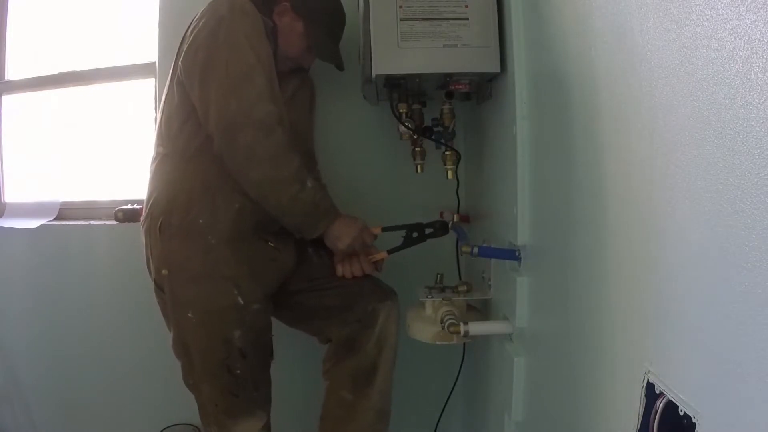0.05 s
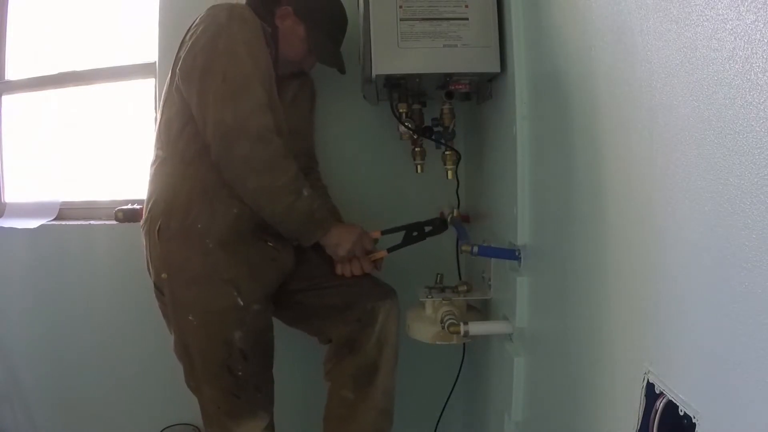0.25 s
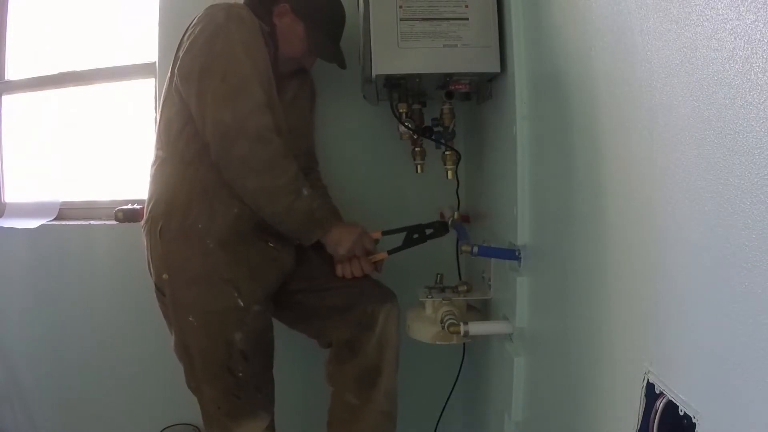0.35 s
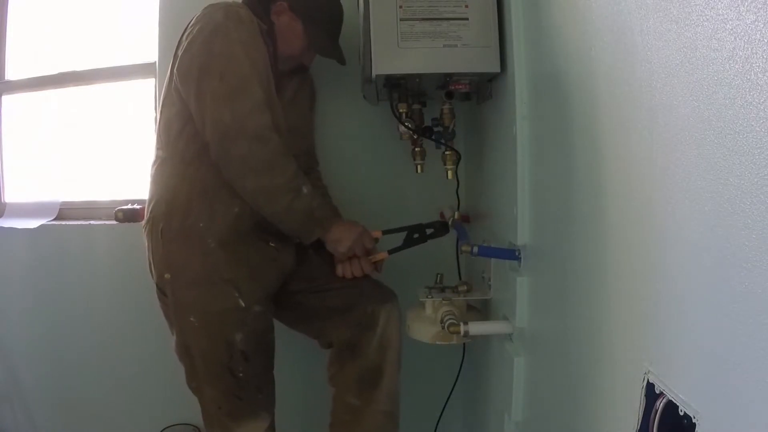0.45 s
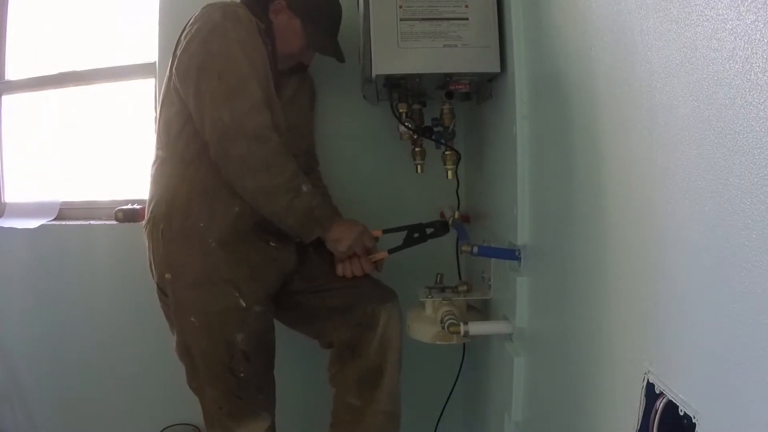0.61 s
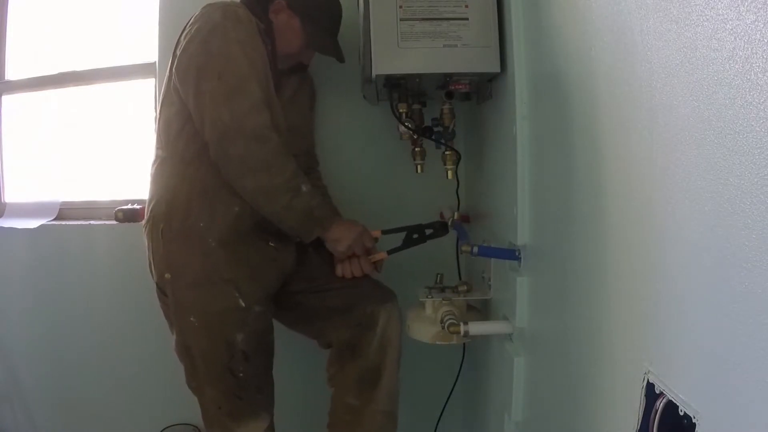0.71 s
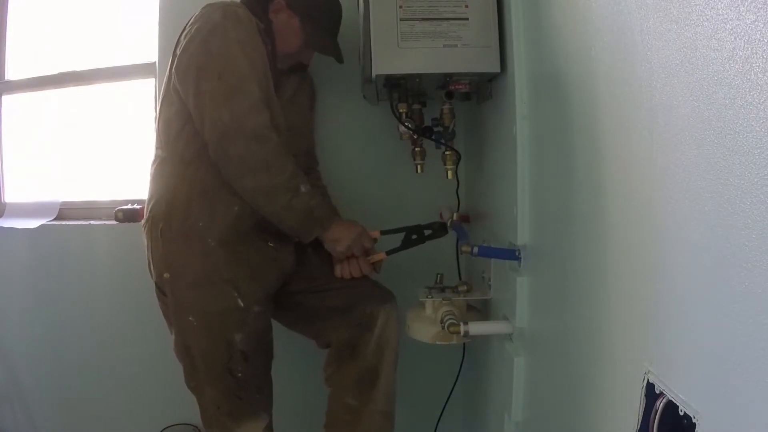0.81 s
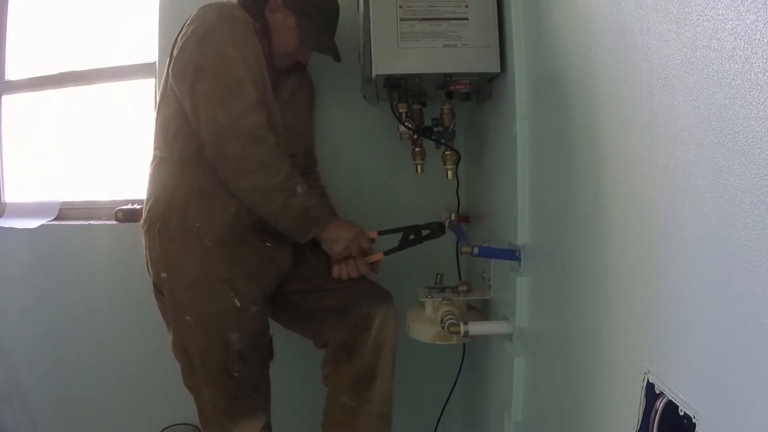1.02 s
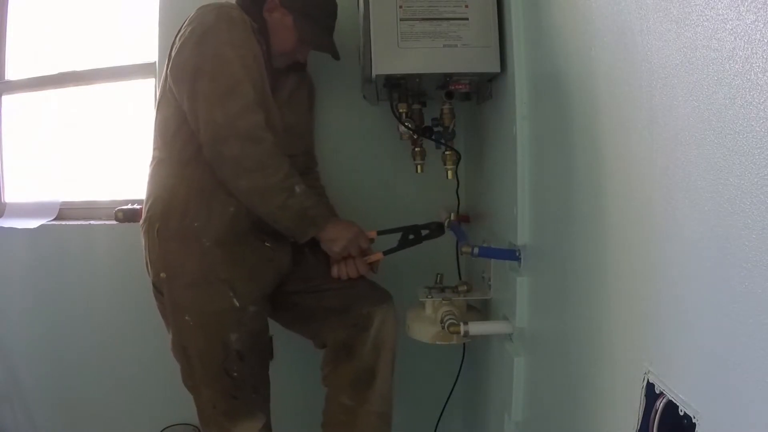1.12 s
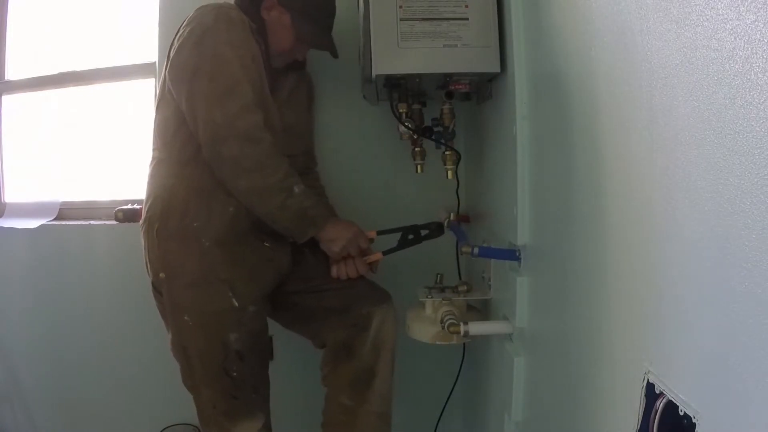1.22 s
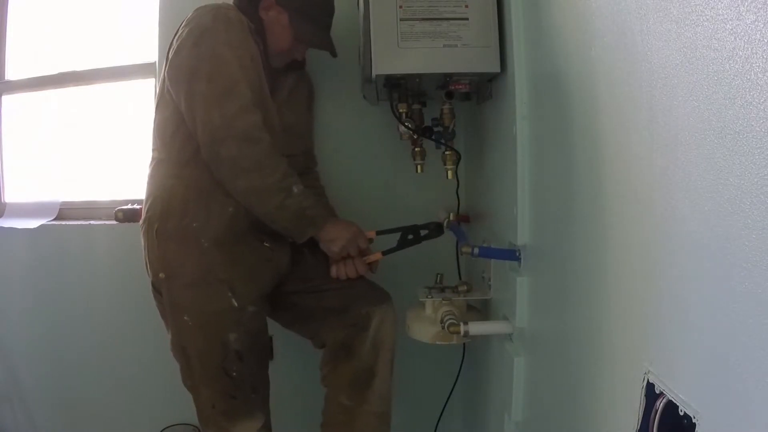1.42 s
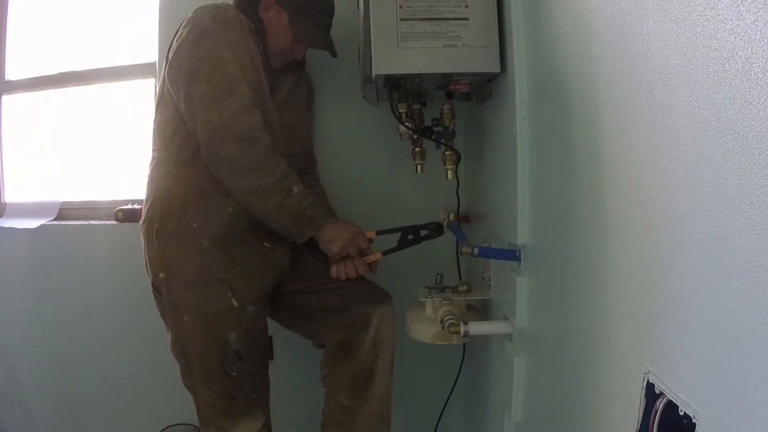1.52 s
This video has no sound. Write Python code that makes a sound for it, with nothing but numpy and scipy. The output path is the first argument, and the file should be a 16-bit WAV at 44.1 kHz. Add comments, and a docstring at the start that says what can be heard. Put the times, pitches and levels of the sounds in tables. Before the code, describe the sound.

A ratchet crimping tool gives a few quick metallic clicks right from the start. At about 0.2 seconds the clamp snaps shut with a loud crack, and the pipe rings briefly in the bare, echoing room. From around 1 second the jaws open with small ticks and a thin, high ring. A short, dull clatter follows near 1.2 seconds, then two faint ticks at 1.4, over a faint room hush.

```python
"""Quick clicks echo in a bare room: a long-handled ratchet crimper is squeezing a clamp onto a pipe,
and its pawl (a small catch) drops over tooth after tooth. The clamp snaps shut with a loud crack
that shakes pipe and wall. After a pause the jaws let go with small ticks and a thin ring of steel,
and the tool knocks free of the fitting. A faint hush of air lies under it all."""
import sys
import numpy as np
from scipy import signal
from scipy.fft import next_fast_len
from scipy.io import wavfile
from scipy.ndimage import uniform_filter1d

SR = 44100
rng = np.random.default_rng(int(sys.argv[2]) if len(sys.argv) > 2 else 0)


def to_wav(s):
    """Save 16-bit WAV."""
    ch = np.atleast_2d(s).T  # columns
    pcm = np.round(np.clip(ch, -1, 1) * 32767)  # PCM
    wavfile.write(sys.argv[1], SR, pcm.astype(np.int16))


N = 68355
T = np.arange(N) / SR


def amp(db):
    """Turns decibels into a number to multiply a sound by."""
    return 10 ** (np.asarray(db) / 20)


def read(points, hz):
    """Looks up a value between a table's rows, with every octave equally wide."""
    row_hz, value = np.transpose(points)
    return np.interp(np.log(hz + 1), np.log(row_hz), value)


def fade(t, t60):
    """Dies away by 60 dB in t60 seconds, the 'fade time'."""
    return np.exp(-np.log(1000) * t / t60)


def unit(x):
    """Scales a sound to a total energy of one."""
    return x / np.sqrt(np.sum(x ** 2) + 1e-20)


def place(s, sound):
    """Starts a sound at s seconds, with silence around it."""
    at = round(s * SR)
    return np.pad(sound[max(-at, 0):], (max(at, 0), N))[:N]


def colour(x, points):
    """Makes each frequency louder or softer, as a table says."""
    size = next_fast_len(2 * N)
    hz = abs(np.fft.fftfreq(size, 1 / SR))
    log_gain = np.log(amp(read(points, hz)))
    response = np.exp(np.conj(signal.hilbert(log_gain)))  # rings after a blow, never before it
    return np.fft.ifft(np.fft.fft(x, size) * response).real[:N]


def even_noise(size=1024):
    """Noise with its strongest chance peaks softened."""
    spectrum = signal.stft(rng.standard_normal(N), nperseg=size)[2]
    noise = signal.istft(spectrum / (abs(spectrum) + 1e-12) ** .25, nperseg=size)[1][:N]
    return noise / noise.std()


def ring(modes, rise_s):
    """A struck object sounds its own tones (modes), which swell quickly and die away."""
    tones = sum(amp(db) * fade(T, t60) * np.sin(2 * np.pi * hz * T) for hz, db, t60 in modes)
    return (1 - np.exp(-T / rise_s)) * tones


def room_air():
    """The still air of the room makes a faint, low hush."""
    # tone of the hush (frequency [Hz], level [dB])
    hush_colour = [(20, -42), (60, -39), (130, -41.5), (300, -45.5), (600, -49.5), (1300, -51), (3000, -62),
                   (6000, -67.5), (10000, -78), (15000, -78)]
    return colour(rng.standard_normal(N), hush_colour)


def room_echo():
    """Strong early echoes come from the corner, then a tail that grows duller."""
    # how long the room echoes (frequency [Hz], fade time [s])
    fade_times = [(80, 1), (250, 0.93), (600, 1), (1300, 1), (2700, 0.85), (4000, 0.75), (5500, 0.63),
                  (8000, 0.48), (11000, .35), (15000, 0.21)]
    hz, t, spectrum = signal.stft(even_noise(), SR, nperseg=256)
    tail = fade(t, read(fade_times, hz)[:, None])
    early = amp(2) * fade(t, t60=.29)
    echo = signal.istft(spectrum * (tail + early), SR, nperseg=256)[1][:N]
    arrival = np.clip(T / .004 - .5, 0, 1)  # the first echoes take about 4 ms
    return unit(echo * arrival)


def hit(points, t60, echo_db, sharp, thin_hz):
    """A sharp spike and a short rattle of steel parts, weak below thin_hz; then the fuller echo."""
    direct = unit(even_noise(size=128) * fade(T, t60))
    direct[0] += sharp
    direct = signal.lfilter(*signal.butter(1, thin_hz, "high", fs=SR), unit(direct))
    return colour(direct + amp(echo_db) * room_echo(), points)


def slipping_steel():
    """Slipping steel rings very high, its pitch a little unsteady."""
    # thin rings (time [s], pitch [Hz], level [dB], rise time [s])
    slips = [(0.9771, 12940, -38.5, 0.0004), (0.983, 12700, -41, .002), (1.07, 12900, -42.5, 0.0075),
             (1.18, 13240, -39.5, 0.0087), (1.186, 12860, -50, .01), (1.322, 13300, -57, 0.0035)]
    waver_hz, echo_db = 45, 6
    out = np.zeros(N)
    for s, hz, db, rise_s in slips:
        waver = uniform_filter1d(rng.standard_normal(N), size=80)
        cycles = np.cumsum(hz + waver_hz * waver / waver.std()) / SR
        tone = amp(db) * (1 - np.exp(-T / rise_s)) * fade(T, t60=.14) * np.sin(2 * np.pi * cycles)
        echo = amp(echo_db) * signal.fftconvolve(tone, room_echo())[:N]
        out += place(s, tone + echo)
    return out


def jaw_ticks():
    """The jaws give small, crisp ticks as they open."""
    # ticks (time [s], level [dB])
    ticks = [(.9774, 0), (.9848, -1), (0.9991, -20), (1.066, -8.5), (1.072, -15), (1.154, -8), (1.19, -6),
             (1.401, -22), (1.419, -22.5)]
    # tone of a tick (frequency [Hz], level [dB])
    tick_colour = [(150, -38), (700, -16), (2000, -20.5), (4000, -20), (6000, -18), (9000, -20),
                   (12000, -22), (15000, -26)]
    return sum(place(s, amp(db) * hit(tick_colour, t60=.0032, echo_db=5, sharp=.79, thin_hz=2020))
               for s, db in ticks)


def tool_knocks():
    """The tool comes off with a short, dull clatter; the second knock rings the fitting."""
    # knocks (time [s], level [dB])
    knocks = [(1.153, -10), (1.1605, -6.5), (1.168, -3), (1.184, -6.5)]
    # tone of a knock (frequency [Hz], level [dB])
    knock_colour = [(100, -43), (320, -1.5), (500, -8), (780, -1), (1050, -8.5), (1400, 2.5), (1850, -5),
                    (2250, -1), (2700, -4.5), (3500, -2), (4700, -4), (7000, -19), (10000, -21),
                    (15000, -30)]
    # ring of the fitting (pitch [Hz], level [dB], fade time [s])
    fitting_modes = [(342, -47.5, 0.13), (696, -53, 0.25), (755, -43.5, 0.28), (1460, -43, 0.38),
                     (1590, -42.5, 0.12), (2200, -48, 0.51)]
    clatter = sum(place(s, amp(db) * hit(knock_colour, t60=.057, echo_db=-.5, sharp=.3, thin_hz=200))
                  for s, db in knocks)
    return clatter + place(knocks[1][0], ring(fitting_modes, rise_s=.0014))


def ratchet():
    """The pawl drops over one tooth after another, and each click rings the steel handles."""
    # clicks, the first just before the start (time [s], level [dB])
    clicks = [(-.02, -10), (0.0495, -2), (0.1073, -2.5), (.152, -1), (0.197, -3.5)]
    # ring of pawl and handles (pitch [Hz], level [dB], fade time [s])
    pawl_modes = [(3427, -28, 0.029), (3790, -23, 0.012), (3980, -34.5, 0.04), (5130, -32, 0.011),
                  (5940, -43.5, .025), (5680, -31.5, 0.078)]
    # tone of a click (frequency [Hz], level [dB])
    click_colour = [(150, -39), (600, -13.5), (1500, -14), (2500, -5.5), (3000, -2), (3450, 2),
                    (4000, -2.5), (4450, -7), (5200, 1), (5900, 0.5), (6800, -8.5), (9800, -14.5),
                    (10750, -8.5), (12200, -17), (15000, -21)]
    handles = ring(pawl_modes, rise_s=.0004)
    out = np.zeros(N)
    for s, db in clicks:
        click = hit(click_colour, t60=.027, echo_db=4.5, sharp=.6, thin_hz=2800)
        out += place(s, amp(db) * (handles + click))
    return out


def clamp_snap():
    """The clamp gives way with a crack that shakes jaws, pipe and wall; a faint rebound follows."""
    # tone of the crack (frequency [Hz], level [dB])
    crack_colour = [(30, -6), (60, 6), (115, 6.5), (200, 13), (300, 15), (450, 11.5), (620, 13),
                    (820, 18.5), (1100, 16.5), (2000, 17.5), (2450, 20), (2750, 17.5), (3200, 22.5),
                    (4000, 18), (4500, 16.5), (5200, 14), (6500, 13), (8500, 7), (11500, 0.5), (13200, 0.5),
                    (15000, -6.5)]
    # brief ring of the jaws (pitch [Hz], level [dB], fade time [s])
    jaw_modes = [(1620, -11.5, 0.041), (3230, -12.5, .025), (3440, -1.5, 0.009), (3750, -14, 0.06)]
    # hum of the pipe and its heater (pitch [Hz], level [dB], fade time [s])
    pipe_modes = [(142, -43, 0.67), (183, -35.5, .4), (197.7, -33.5, 0.7), (236.7, -22.5, .42),
                  (276.5, -31, 0.63), (297, -33.5, 0.87), (315, -22.5, 0.45), (849, -23, 0.26),
                  (948, -35, 1), (1064, -27, 0.55), (1255, -32, 0.53), (1737, -34, .35), (2500, -30, 0.36),
                  (3040, -27, .42), (3093, -27, .45), (3475, -22, 0.18), (3526, -23, 0.27),
                  (4003, -25.5, 0.58)]
    # hollow thunk of the jolted pipe (pitch [Hz], level [dB], fade time [s])
    thunk_modes = [(813, -13, 0.051), (830, -6.5, .06), (1051, -14.5, .08)]
    wall_hz, throbs_per_s = 80.5, 2.6
    crack = hit(crack_colour, t60=.06, echo_db=6.5, sharp=.35, thin_hz=700)
    jaws = ring(jaw_modes, rise_s=.0002)
    hum = ring(pipe_modes, rise_s=.01)
    thunk = ring(thunk_modes, rise_s=.012)
    throb = np.cos(np.pi * throbs_per_s * T)
    boom = amp(-33) * fade(T, t60=1.1) * throb * np.sin(2 * np.pi * wall_hz * T)
    swell = 1 - np.exp(-T / .012)
    rebound = amp(-12.5) * colour(room_echo() * swell, crack_colour)
    return place(.2092, crack + jaws + hum + boom) + place(.222, thunk) + place(.328, rebound)


def scene():
    """Tool and clamp over the quiet room, in one channel."""
    return (ratchet() + clamp_snap() + jaw_ticks() + slipping_steel() + tool_knocks() + room_air())[None]


def record(dry):
    """A slow volume control dips after loud sounds; peaks are clipped and the highest treble is cut."""
    threshold_db, recovery_db_per_s, dip_share, lag_s = -22.5, 168, .15, .066
    top_hz = 15300
    level_db = 10 * np.log10(abs(uniform_filter1d(dry[0] ** 2, size=256)) + 1e-12)
    fall_db = T * recovery_db_per_s
    peak_db = np.maximum.accumulate(level_db + fall_db) - fall_db  # jumps up, sinks steadily
    over_db = np.maximum(peak_db - threshold_db, 0)
    smoothing = np.exp(-1 / (lag_s * SR))
    dip_db = dip_share * signal.lfilter([1 - smoothing], [1, -smoothing], over_db)
    clipped = np.clip(dry * amp(-dip_db), -1, 1)
    treble_cut = signal.firwin(401, top_hz, window=("kaiser", 8), fs=SR)
    return signal.oaconvolve(clipped, treble_cut[None], "same")


dry = scene()
out = record(dry)
to_wav(out)
```